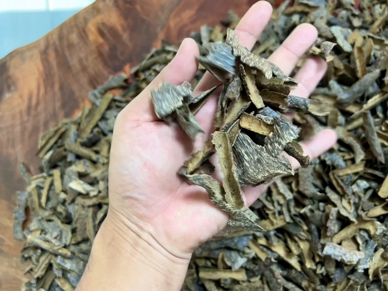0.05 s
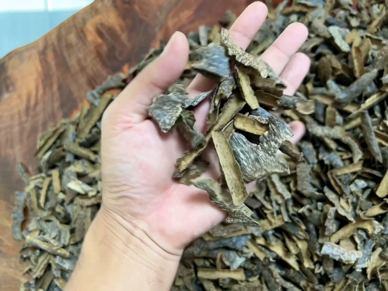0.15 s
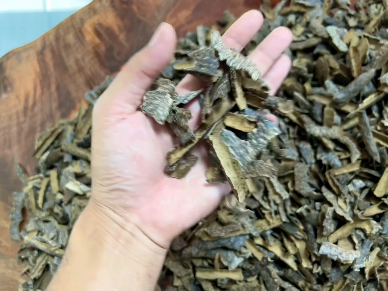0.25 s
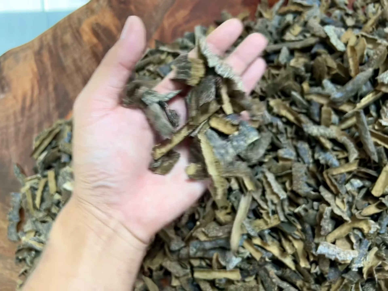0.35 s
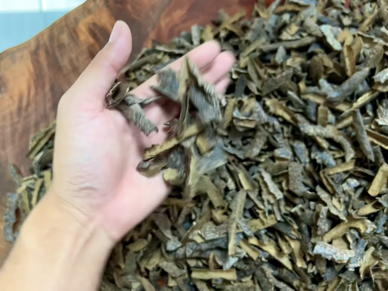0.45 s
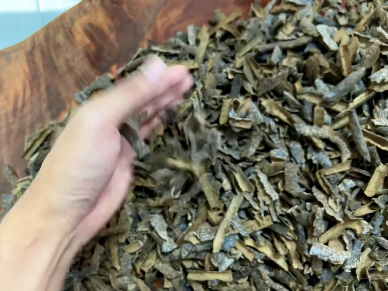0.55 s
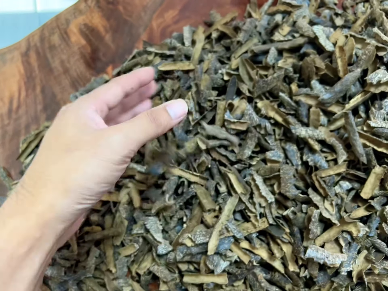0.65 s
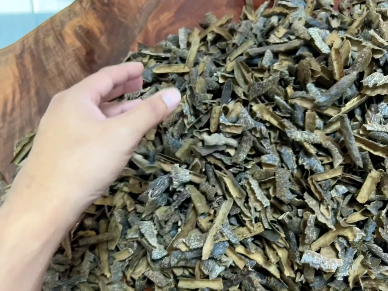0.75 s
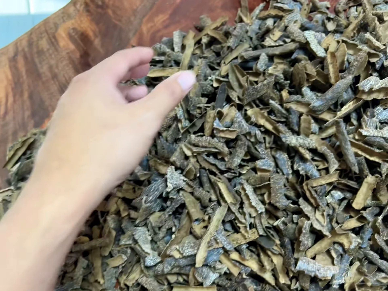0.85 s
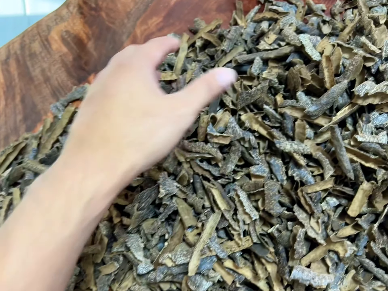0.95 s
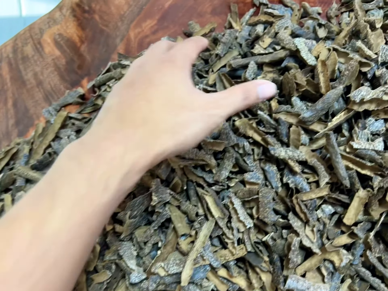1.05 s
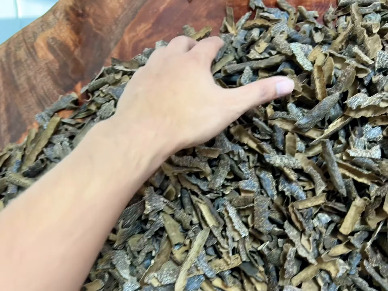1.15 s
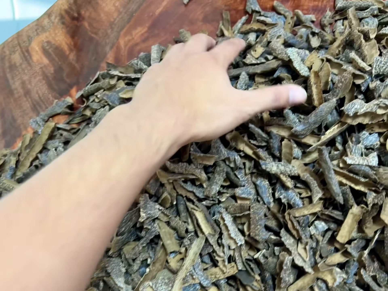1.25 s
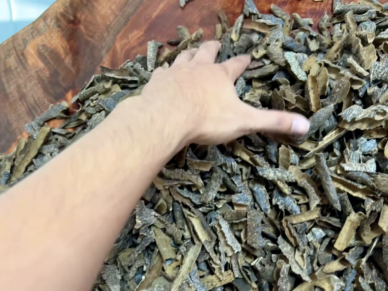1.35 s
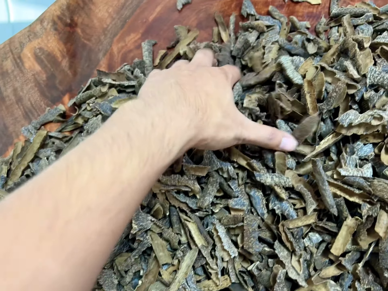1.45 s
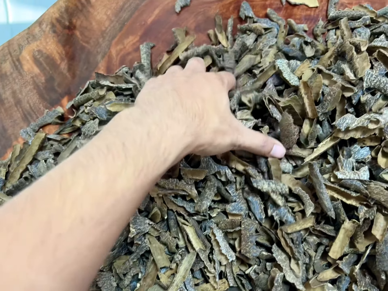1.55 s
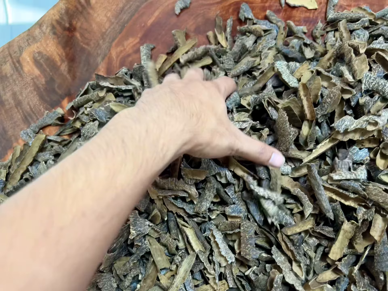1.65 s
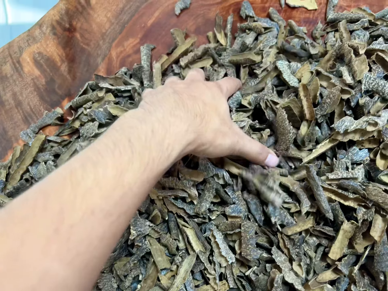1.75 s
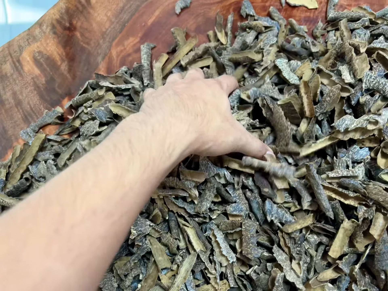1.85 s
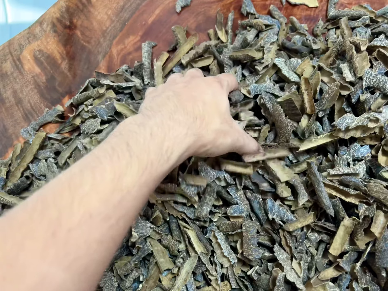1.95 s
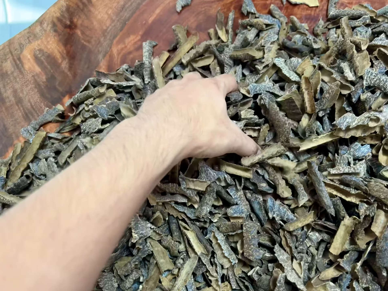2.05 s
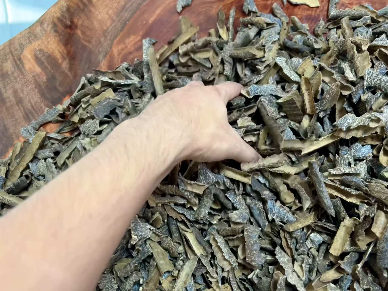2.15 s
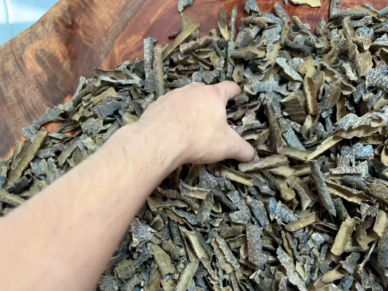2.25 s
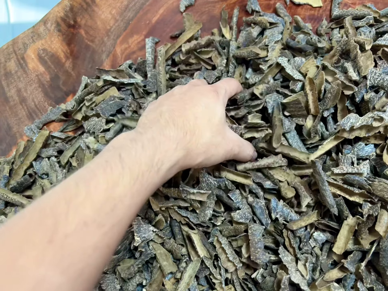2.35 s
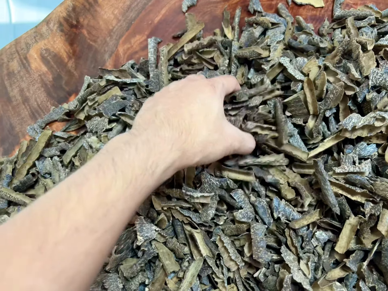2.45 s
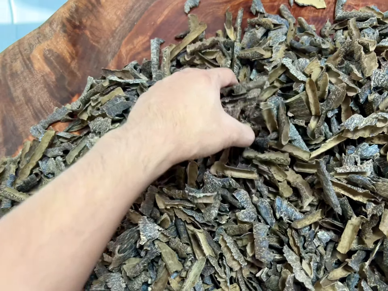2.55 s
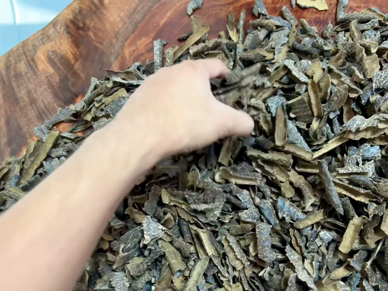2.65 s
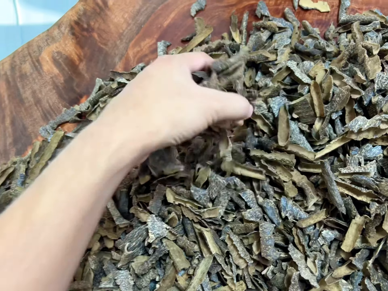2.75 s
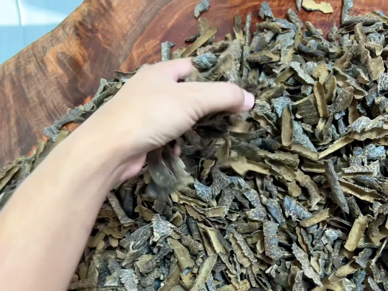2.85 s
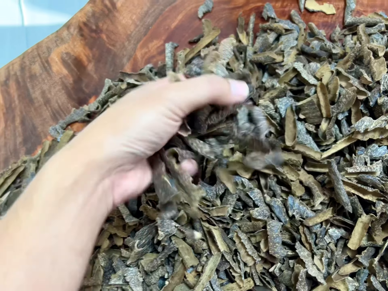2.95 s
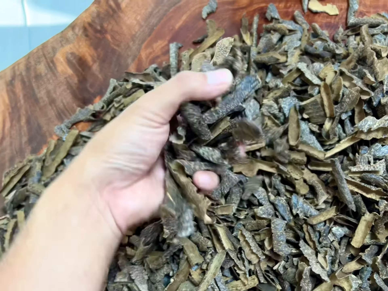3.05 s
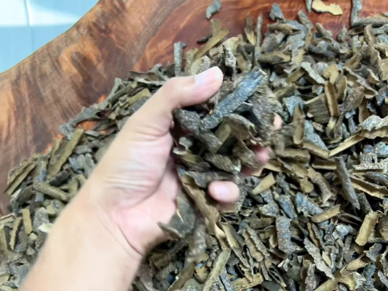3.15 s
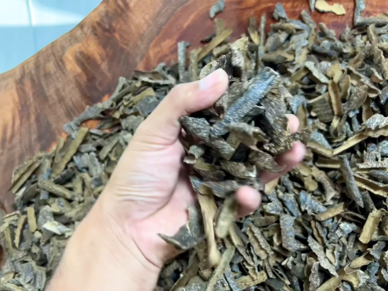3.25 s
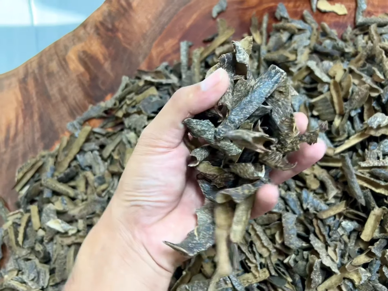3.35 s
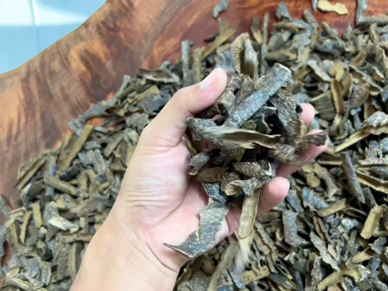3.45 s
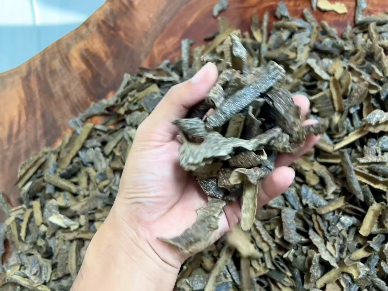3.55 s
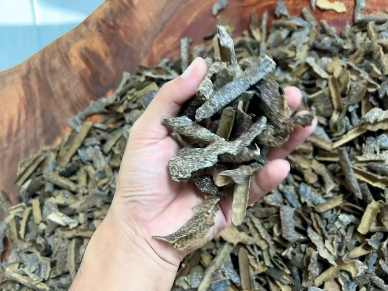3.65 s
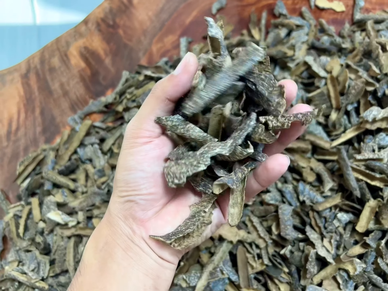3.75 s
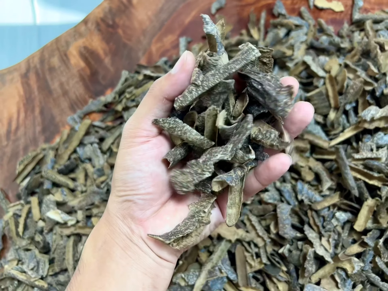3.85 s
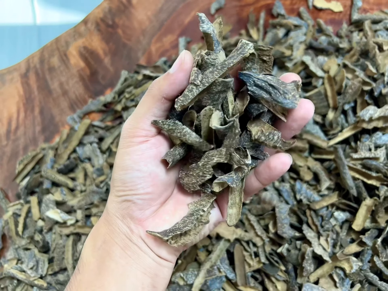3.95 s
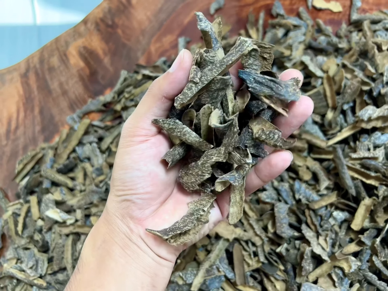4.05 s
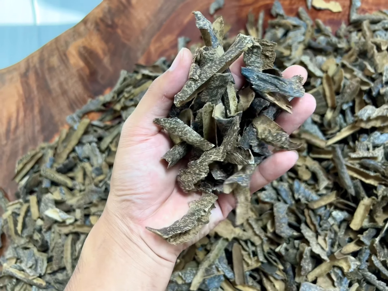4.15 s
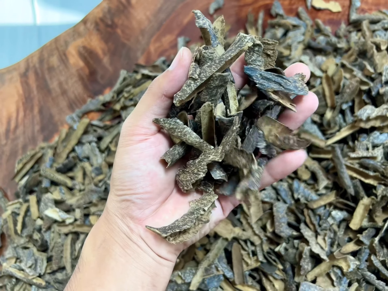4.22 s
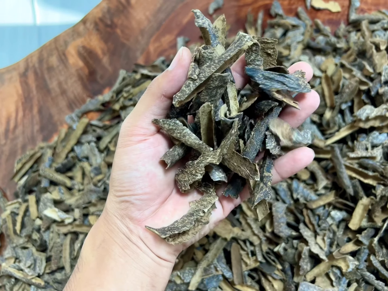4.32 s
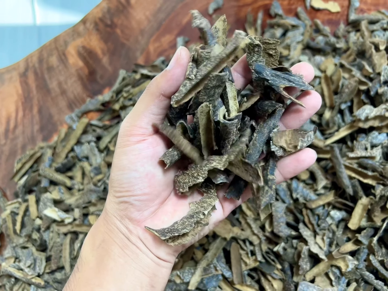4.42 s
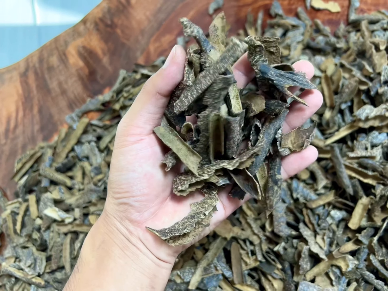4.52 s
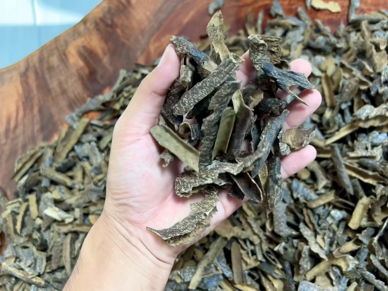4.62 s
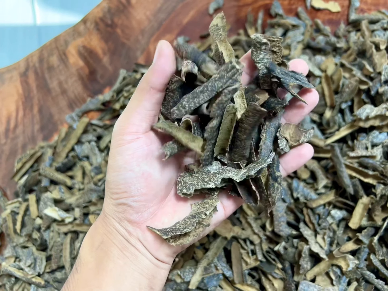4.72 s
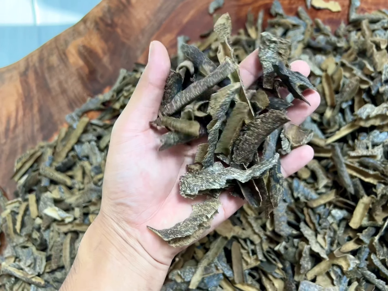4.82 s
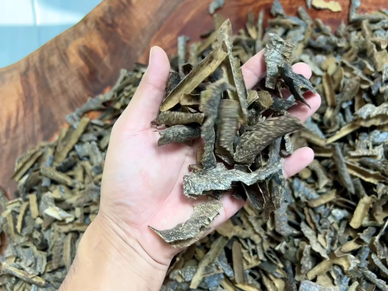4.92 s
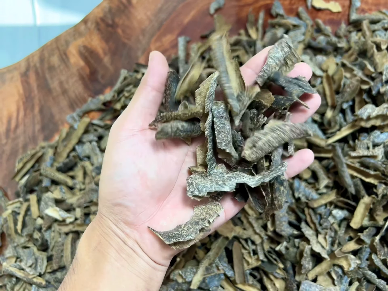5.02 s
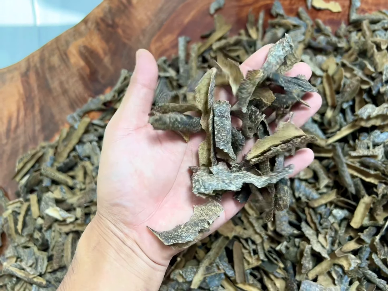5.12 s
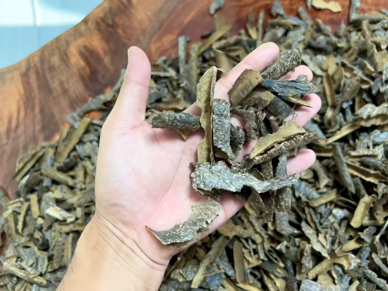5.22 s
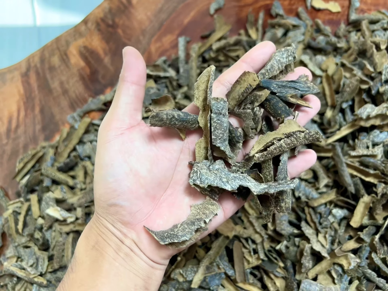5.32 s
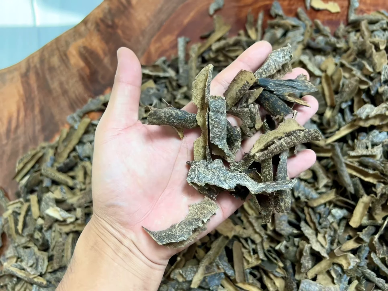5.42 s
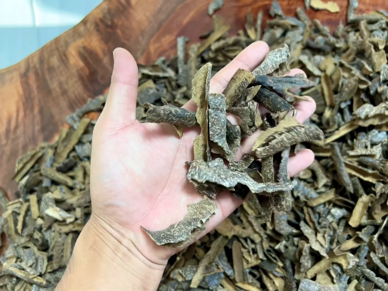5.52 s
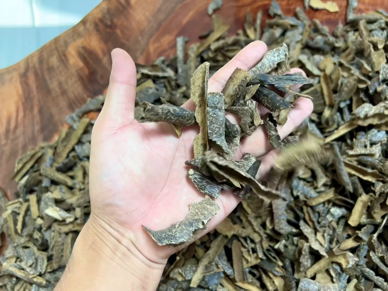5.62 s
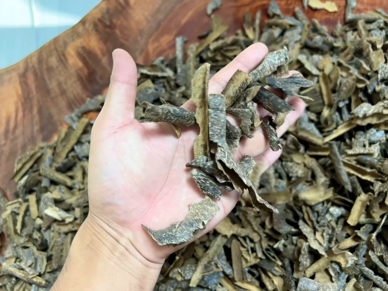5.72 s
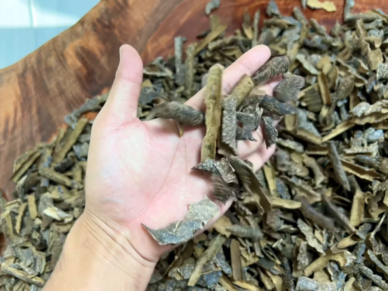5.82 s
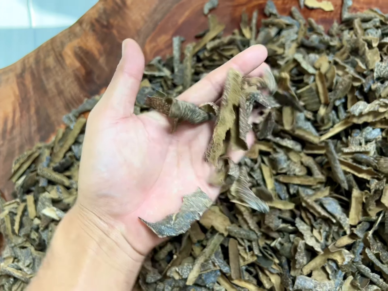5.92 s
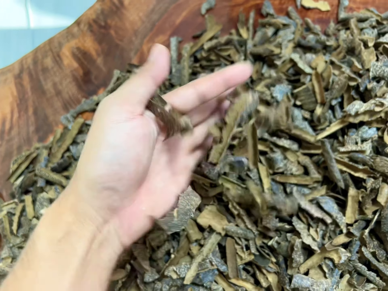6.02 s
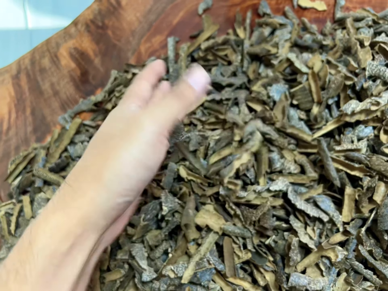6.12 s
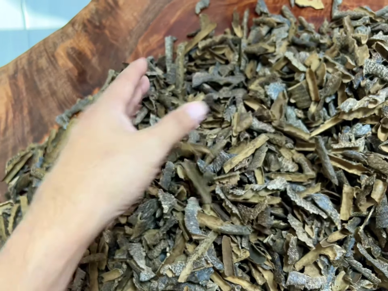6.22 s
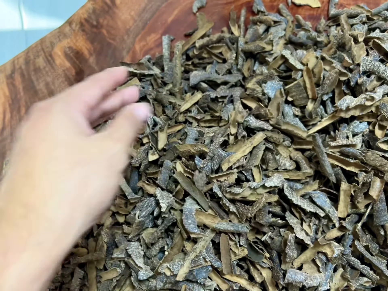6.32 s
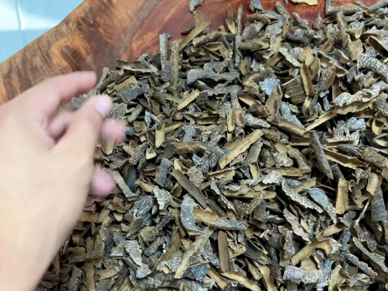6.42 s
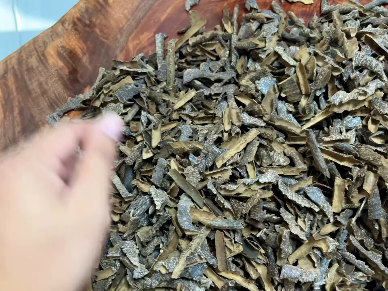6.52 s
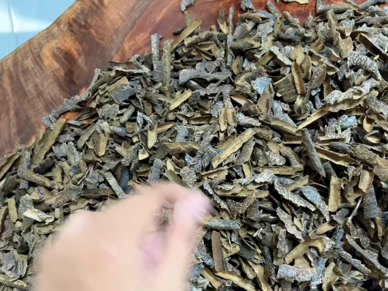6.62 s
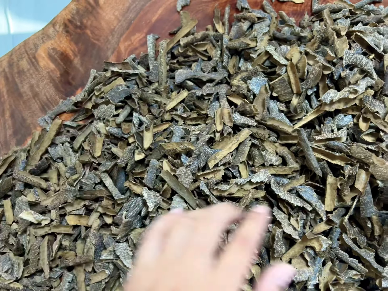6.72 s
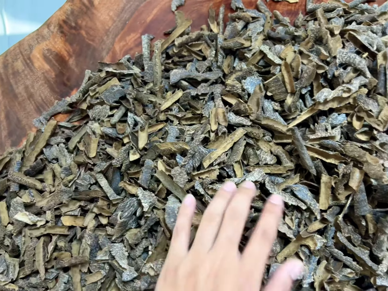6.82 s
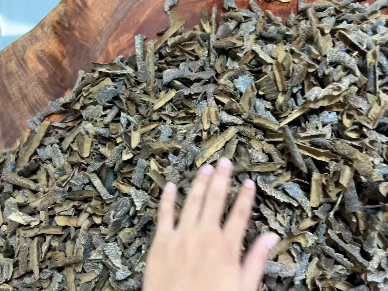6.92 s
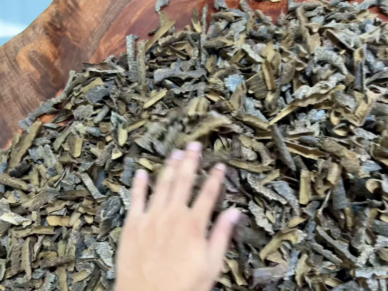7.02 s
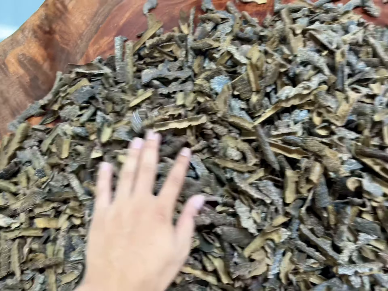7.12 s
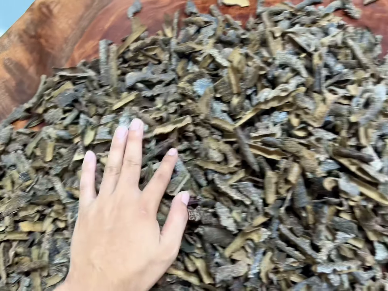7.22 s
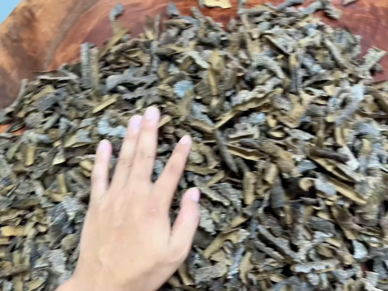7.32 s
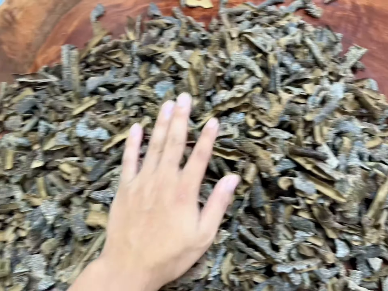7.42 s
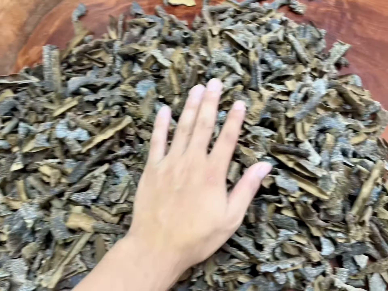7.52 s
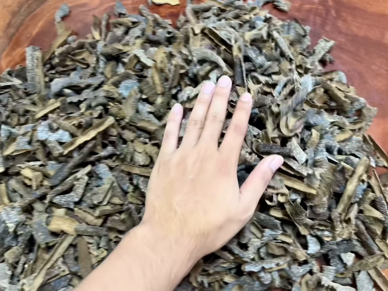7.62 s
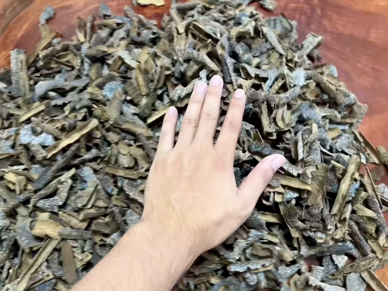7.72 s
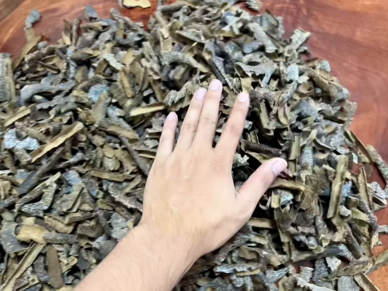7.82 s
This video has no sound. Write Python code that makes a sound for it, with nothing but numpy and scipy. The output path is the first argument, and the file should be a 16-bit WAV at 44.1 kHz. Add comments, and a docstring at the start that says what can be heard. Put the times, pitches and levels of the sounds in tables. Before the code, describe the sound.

Dry curled bark chips drop from a hand with crisp clacks, then get grabbed, jostled, dropped again and stroked in a rustling heap indoors.

```python
"""Bark chips on a wooden table

Indoors, one microphone, the direct sound well above the room's tail: a hand tips, grabs and strokes
dry curled bark chips in a heap. Falling chips clack as sprays of micro-impacts on short modes, pushed
chips rustle as thousands of tiny scraping knocks with brittle snaps, and the table booms faintly on
its low modes under the load. Behind it lie an appliance's mains hum and steady room air."""
import sys
import numpy as np
from scipy import signal
from scipy.fft import rfft, irfft, next_fast_len
from scipy.io import wavfile
from scipy.ndimage import uniform_filter1d

SR = 44100
rng = np.random.default_rng(int(sys.argv[2]) if len(sys.argv) > 2 else 0)


def store_pcm(level_fs):
    """Save levels as 16-bit WAV."""
    pcm = np.round(np.clip(level_fs, -1, 1) * 32767).astype(np.int16)
    wavfile.write(sys.argv[1], SR, np.atleast_2d(pcm).T)


N = 347067


def from_db(db):
    """Gain of a level in dB."""
    return 10 ** (np.asarray(db) / 20)


def rms_one(x):
    """Scaled to rms 1."""
    return x / np.sqrt(np.mean(x ** 2) + 1e-20)


def at_hz(points, hz):
    """A spectrum read on a log-frequency axis."""
    corners_hz, levels_db = np.array(points).T
    return np.interp(np.log(hz), np.log(corners_hz), levels_db)


def colour(x, points):
    """Shape a steady signal by a spectrum."""
    size = next_fast_len(N)
    hz = np.maximum(np.arange(size // 2 + 1) * SR / size, 1)
    return irfft(rfft(x, size) * from_db(at_hz(points, hz)), size)[:N]


def drift(rate_hz):
    """Slow random wander of rms 1: noise through a double low-pass pole."""
    r = np.exp(-2 * np.pi * rate_hz / SR)
    wander = signal.lfilter([1], [1, -2 * r, r * r], rng.standard_normal(N + SR))
    return rms_one(wander[SR:])   # the first second lets the filter settle


def resonance(x, hz, width_hz):
    """Two-pole band-pass with gain 1 on top."""
    r = np.exp(-np.pi * width_hz / SR)
    zeros = np.array([1, 0, -1]) * (1 - r * r) / 2
    poles = [1, -2 * r * np.cos(2 * np.pi * hz / SR), r * r]
    return signal.lfilter(zeros, poles, x + 1e-18)


# Colour of the room air: (frequency [Hz], relative density [dB per Hz])
AIR_COLOUR = [(30, -27), (45, 1.5), (100, -3), (250, 0.5), (450, -5), (650, -12), (1500, -22), (4000, -27),
              (7000, -42), (16000, -42)]
AIR_DB = -65.5   # rms


def room_air():
    """Steady noise of the quiet room, mostly low, shaped by its spectrum."""
    noise = rng.standard_normal(N)
    return from_db(AIR_DB) * rms_one(colour(noise, AIR_COLOUR))


# Mains harmonics of the appliance in the room: (frequency [Hz], level around which it wavers [dB rms])
HUM_HARMONICS = [(102.3, -74.5), (199.2, -63.5), (247.6, -75.5), (301.5, -77), (398.4, -73), (500.6, -78)]


def hum(waver_db):
    """Mains harmonics of an appliance, each throbbing unevenly."""
    t = np.arange(N) / SR
    total = np.zeros(N)
    for hz, db in HUM_HARMONICS:
        level = from_db(db + waver_db * drift(11))
        total += np.sqrt(2) * level * np.sin(2 * np.pi * (hz * t + rng.random()))
    return total


ROOM_T60_S, ROOM_DB, WALL_CUT_HZ = 0.59, -13, 7200   # decay, tail re direct sound, low-pass of the long tail


def room(x):
    """Tail of dense reflections that dies exponentially, treble first."""
    t = np.arange(SR) / SR
    dull, bright = rng.standard_normal((2, SR))
    low_pass = signal.butter(2, WALL_CUT_HZ, fs=SR, output="sos")
    long_tail = signal.sosfilt(low_pass, dull) * from_db(-60 * t / ROOM_T60_S)
    short_tail = 2.86 * bright * from_db(-60 * t / (0.17 * ROOM_T60_S))
    tail = (long_tail + short_tail) * (t > .003)   # first wall path
    tail /= np.sqrt(np.sum(tail ** 2))
    return from_db(ROOM_DB) * signal.fftconvolve(x, tail)[:N]


# Low modes of the wooden table top: (frequency [Hz], width [Hz], relative level [dB])
TABLE_MODES = [(104.2, 6.3, 0.5), (137, 58, 6), (224, 37, 1)]
BOOM_DB, BOOM_LAG_S = -63, 0.022   # boom at a rustle of -45 dB; smoothing of the load


def table(rustle_db):
    """The heap's shifting weight drives the low modes of the table top, following the rustle with a lag."""
    keep = np.exp(-1 / (BOOM_LAG_S * SR))
    load_db = signal.lfilter([1 - keep], [1, -keep], rustle_db + 45)
    load = rng.standard_normal(N)
    boom = np.zeros(N)
    for hz, width_hz, db in TABLE_MODES:
        boom += from_db(db) * resonance(resonance(load, hz, width_hz), hz, 2 * width_hz)
    return from_db(BOOM_DB + load_db) * rms_one(boom)


# Chips pushed or sliding as a mass: (start [s], rise [s], hold [s], nominal rustle level [dB],
# treble re rustle [dB])
MASS_SHOVES = [(0.0, 0.068, 0.016, -55, 2.5), (0.546, 0.011, 0.11, -40, 4.5), (1.291, 0.043, 0.05, -40, -8),
               (1.413, 0.063, 0.074, -38, -9.5), (1.607, 0.029, 0.22, -41, -9),
               (1.799, 0.14, 0.039, -37, -6.5), (2.062, 0.058, 0.029, -35, -7.5),
               (2.168, 0.085, 0.069, -37, -9), (2.367, 0.089, 0.026, -38.5, -7),
               (2.549, 0.05, 0.21, -41, -5.5), (2.925, 0.043, 0.016, -42, -24),
               (3.296, 0.18, 0.033, -45, -9), (3.737, 0.037, 0.12, -49.5, -5),
               (4.142, 0.13, 0.012, -56, -2), (4.356, 0.13, 0.21, -56.5, -3.5),
               (4.677, 0.031, 0.099, -52, -3), (4.905, 0.071, 0.11, -50, -2),
               (5.087, 0.096, 0.022, -38.5, -5.5), (5.302, 0.044, 0.0097, -37.5, -10),
               (5.486, 0.071, 0.056, -49, -14.5), (5.763, 0.012, 0.023, -39, 0.5),
               (5.961, 0.038, 0.03, -44.5, -3.5), (6.03, 0.12, 0.04, -48, -17.5),
               (6.878, 0.095, 0.04, -41, -7.5), (6.937, 0.088, 0.097, -36, -6.5),
               (7.538, 0.009, .02, -63, -6), (7.593, 0.01, .3, -39, -11)]
RISE_DB, FALL_DB_PER_S, TREBLE_FALL_DB_PER_S = 14.5, 102, 150.5   # every shove swells and dies alike
CONTACT_S = 0.0087   # a shove fades in over this time just before its start
# Chips settle after a clack: level re its peak, fall, treble re that level
SETTLE_DB, SETTLE_DB_PER_S, SETTLE_TREBLE_DB = -31, 138, -7
REST_DB, REST_TREBLE_DB = -84, -98   # the heap at rest


def stir():
    """Rustle and treble level in dB: shoves rise, hold and fall, clacks leave chips settling; powers add."""
    now, power = np.arange(N) / SR, np.zeros((2, N))
    for start, rise_s, hold_s, level_db, treble_db in MASS_SHOVES:
        rising = np.clip(1 - (now - start) / rise_s, 0, 1)
        touching = np.clip((now - start) / CONTACT_S + 1, 0, 1) ** 2
        after = np.maximum(now - start - rise_s - hold_s, 0)
        top_db = level_db - RISE_DB * rising
        body_db = top_db - FALL_DB_PER_S * after
        bright_db = top_db + treble_db - TREBLE_FALL_DB_PER_S * after
        power += touching * from_db(2 * np.array([body_db, bright_db]))   # doubled dB: power
    struck = np.zeros(N)
    for s, peak_db, *_ in CHIP_CLACKS:
        struck[round(s * SR)] = from_db(2 * (peak_db + SETTLE_DB))
    settling = signal.lfilter([1], [1, -from_db(-2 * SETTLE_DB_PER_S / SR)], struck + 1e-30)
    power += settling * from_db([[0], [2 * SETTLE_TREBLE_DB]])
    power += from_db([[2 * REST_DB], [2 * REST_TREBLE_DB]])
    return 10 * np.log10(power)


# Colour of the rustle: (frequency [Hz], relative density [dB per Hz])
RUSTLE_COLOUR = [(150, -41), (260, -11), (274, -14.5), (401, -9.5), (445, -10.5), (973, -3.5), (2400, -3),
                 (3280, -2), (9970, -1.5), (11300, 0), (15400, -10), (16500, -20.5)]


def rustle(rustle_db, treble_db, spread_db, clump_db, quality, scrape_s):
    """Clumped random knocks, each a tiny scrape ringing a small chip; a firmer push knocks more often."""
    per_s = 3000 + 6000 * from_db(.5 * (rustle_db + 46.0))
    sizes = from_db(spread_db * np.minimum(rng.exponential(1, N), 5))
    slips = drift(45)
    brief_slips = slips - uniform_filter1d(slips, size=2500)   # the hand sets the slow swell
    clumps = from_db(clump_db * brief_slips)
    knocks = sizes * (rng.random(N) < per_s * clumps / SR) / np.sqrt(per_s)
    pitches, dealt = np.geomspace(300, 15500, 32), rng.integers(0, 32, N)
    fade, grit = np.exp(-1 / (scrape_s * SR)), rng.standard_normal(N)
    out = np.zeros(N)
    for k, hz in enumerate(pitches):
        struck = knocks * ((dealt == k) | (dealt == (k + 11) % 32))   # a knock sounds two modes
        envelope = signal.lfilter([1], [1, -fade], struck + 1e-18)
        scraped = np.roll(grit, 997 * k) * envelope
        ringing = resonance(resonance(scraped, hz, hz / quality), hz, hz / 2)
        share = np.clip(np.log2(hz / 5000), 0, 1)   # high modes follow the treble level
        level_db = (1 - share) * rustle_db + share * treble_db + at_hz(RUSTLE_COLOUR, hz) - 44.5
        out += from_db(level_db) * np.sqrt(hz) * rms_one(ringing)   # bands widen with pitch
    return out


SNAPS_PER_S = 120   # brittle edges snapping inside the rustle
SNAP_DB, SNAP_SPREAD_DB, SNAP_HZ = 16, 5, 3000   # size re rustle before the band-pass, spread, lower edge


def snaps(rustle_db):
    """Lone broadband clicks a few samples long, as strong as the rustle around them."""
    sizes = from_db(SNAP_SPREAD_DB * np.minimum(rng.exponential(1, N), 4)) * rng.choice([-1, 1], N)
    happens = rng.random(N) < SNAPS_PER_S / SR
    clicks = sizes * happens * from_db(rustle_db + SNAP_DB)
    band = signal.butter(2, [SNAP_HZ, 13000], "band", fs=SR, output="sos")
    return signal.sosfilt(band, clicks + 1e-18)


# Spells when chips lie loose in the hand or tumble: (from [s], to [s])
LOOSE_SPELLS = [(0.0, 0.9), (2.4, 6.4)]
SMALL_PER_S, SMALL_DB, SMALL_SPREAD_DB = 32, 17, 2.5   # rate while loose, least peak re rustle, spread
SMALL_BODY_DB, SMALL_TREBLE_DB, SMALL_COLOUR_DB = -8, -5.5, 13   # mean colour re middle, its full range


def small_clacks(rustle_db):
    """Rows for clacks() at random moments, as strong as the rustle around them allows."""
    when, size, body, treble, pitch = rng.random((int(SMALL_PER_S * N / SR), 5)).T
    s = when * N / SR
    peak_db = rustle_db[(when * N).astype(int)] + SMALL_DB - SMALL_SPREAD_DB * np.log(1 - .95 * size)
    body_db = SMALL_BODY_DB + SMALL_COLOUR_DB * (body - .5)
    treble_db = SMALL_TREBLE_DB + SMALL_COLOUR_DB * (treble - .5)
    main_hz = 2000 * 4 ** pitch
    rows = zip(s, peak_db, body_db, treble_db, main_hz)
    return [row for row in rows if any(start < row[0] < end for start, end in LOOSE_SPELLS)]


# Single chips striking: (time [s], nominal peak [dB], body below 2 kHz re middle [dB],
# treble above 7 kHz re middle [dB], strongest mode [Hz])
CHIP_CLACKS = [(0.05, -33, -12, 9, 5330), (0.212, -16, -1.5, 5, 5380), (0.23, -14.5, -11, -2.5, 3880),
               (0.288, -14, -3.5, -1.5, 1180), (0.372, -18.5, 2.5, 6.5, 3470), (0.38, -17.5, -9, 0, 4230),
               (0.401, -24, -12, 4, 6000), (0.41, -18, -17.5, 2.5, 5530), (0.458, -25, -13, -7, 3000),
               (0.471, -21.5, -13.5, 1, 2110), (0.511, -25.5, -8.5, -1, 5430), (0.549, -8, -12, 5, 7180),
               (0.561, -17, -3.5, 0.5, 7200), (0.571, -13, -6, 7.5, 9000), (0.589, -9.5, -12, -2, 6740),
               (0.594, -5, -7, 0.5, 6500), (0.605, -9.5, -11, -4, 5000), (0.618, -7.5, -20, 3, 5650),
               (0.644, -13.5, -2, -2.5, 6960), (0.671, -12, -23.5, -10, 6460), (0.712, -10.5, -4, -1, 6900),
               (0.728, -13, -16.5, -2, 6560), (0.744, -12, -17, -1, 6200), (0.798, -25.5, -16, 4, 3240),
               (0.848, -29.5, -20, -14, 4660), (1.497, -24, -10, 3, 5300), (1.521, -23, -10, -6, 6940),
               (1.558, -27, -4, -4, 3170), (1.655, -23.5, -12, -8, 1800), (1.689, -25, -12, -11, 6900),
               (1.835, -31, -10, 5, 6320), (1.944, -22, -15, 6, 10600), (2.259, -23, -18, -9, 7300),
               (2.374, -22.5, -6, 2, 3340), (2.413, -19, -2, -2, 3060), (2.514, -25.5, -26, -15, 5000),
               (2.609, -17, 1, 9, 3700), (2.632, -26.5, -10, 4, 9000), (2.704, -16, -17, -8, 6600),
               (2.785, -20, -15, -3, 1670), (2.826, -24.5, -11, -4, 1710), (2.892, -19.5, -14, -17, 3600),
               (2.959, -24, -8, -9, 4800), (2.992, -18.5, -3, 4, 4000), (2.999, -16.5, -8, 1, 3840),
               (3.017, -22, -4, -8, 4540), (3.077, -25, -6, 1, 8400), (3.095, -28.5, -7, -16, 2540),
               (3.144, -24, -8, 0, 4240), (3.154, -19.5, -16, -2, 7000), (3.165, -12.5, -23, 4.5, 3100),
               (3.173, -18.5, -18, 23, 8140), (3.236, -26, -15, -9, 5560), (3.27, -15.5, -11, -1, 3020),
               (3.285, -19, -10, -5, 3020), (3.308, -24, -5, -5, 6400), (3.395, -24.5, 0, 11, 3000),
               (3.481, -17.5, -7, -1, 980), (3.571, -10.5, -4, 5, 6060), (3.583, -16.5, -7, 4, 5800),
               (3.639, -16.5, -6, 4, 4700), (3.82, -23.5, -8, -13, 2830), (3.84, -24, -10, 2, 7080),
               (3.886, -30.5, -20, -13, 3130), (3.922, -23.5, -13, -7, 5160), (3.985, -31.5, -4, 5, 2280),
               (4.032, -15.5, -12, 3, 1370), (4.1, -29.5, -15, -1, 3600), (4.187, -30.5, -20, -5, 5040),
               (4.357, -26, -4.5, -1, 3490), (4.525, -30.5, -21, 0, 4000), (4.535, -25.5, -11, -11, 4140),
               (4.583, -31.5, -14, -15, 4970), (4.616, -29.5, -4, 0, 2700), (4.641, -27, -31, -12, 7250),
               (4.72, -28.5, -22, -7, 3970), (4.732, -33.5, -14, -1, 3020), (4.75, -19, -3.5, -8, 7300),
               (4.76, -27.5, -13, -9, 1160), (4.878, -24, -12, 2, 3420), (4.929, -28, -1, 4, 3970),
               (4.98, -27.5, -24, -16, 5130), (5.01, -12.5, -27, -2, 8200), (5.055, -12.5, -4.5, 2, 7300),
               (5.132, -12, -6.5, -3, 4180), (5.192, -12.5, -8, -5, 4600), (5.215, -26.5, -13, -12.5, 4800),
               (5.233, -16.5, -6.5, -13, 3400), (5.269, -11, -7.5, -11, 4300), (5.316, -12, -12, -4, 3450),
               (5.336, -18.5, -23, -2, 5100), (5.366, -18.5, 5, -10.5, 5000),
               (5.429, -33.5, 10.5, -22, 1300), (5.489, -15, -1, -2.5, 3600),
               (5.521, -14.5, -5, -10.5, 1220), (5.525, -22, -15, -1.5, 1190),
               (5.54, -18.5, -7.5, -3, 1210), (5.546, -22.5, -15.5, 1.5, 8440),
               (5.55, -16.5, -1, -14, 6130), (5.562, -24, -1, -2, 4770), (5.641, -23.5, -4, -5.5, 3040),
               (5.768, -7.5, -1, 9.5, 7000), (5.778, -7, -12.5, 1.5, 7150), (5.802, -12, -12, 0, 4230),
               (5.863, -17.5, -21, -5, 5060), (5.904, -18, -9.5, 1, 4140), (5.942, -25, -4, -4, 7100),
               (5.98, -15.5, -7.5, -4, 6430), (5.996, -17.5, 7, 11.5, 8800), (6.043, -2.5, -32, 3, 3900),
               (6.075, -15, -17, -12.5, 3720), (6.097, -15, -15, 8.5, 4150),
               (6.104, -2.5, -13, -13.5, 3920), (6.122, -3.5, -21, -4, 6150), (6.135, -12, -7, 0, 5850),
               (6.164, -10.5, -15, 8, 6200), (6.168, -8, -11.5, -11, 7860), (6.207, -16, 5, 3, 2840),
               (6.255, -14.5, -9, -1, 4460), (6.261, -15, -20, 9, 3780), (6.343, -30.5, -7, -6, 4130),
               (6.888, -34.5, -11, 4, 4120), (6.91, -30, -4, -9, 4400), (6.942, -21.5, 4, 10, 3000),
               (6.96, -23.5, -5, -2, 7340), (6.998, -21.5, -7, -5, 4900), (7.125, -24.5, -13, 6, 2990),
               (7.173, -21, 10, 15, 6500), (7.234, -25.5, -2, -5, 6500), (7.284, -23, -17, -2, 4040),
               (7.313, -31, -20, -13, 4200), (7.539, -32, -9, -0.5, 6430), (7.651, -20, -2, -6, 4130),
               (7.807, -21, -4, 2, 2260), (7.82, -20.5, -8, -10, 5800)]
# Body, middle and treble modes of a chip: (from [Hz], to [Hz], T60 [s])
MODE_RANGES = [(1020, 1875, 0.0087), (2260, 7000, 0.017), (6880, 13000, 0.0084)]
MAIN_MODE_DB, MAIN_MODE_T60_S = -5.5, 0.014   # the strongest mode, re all others
LEAD_S, LEAD_DB = 0.0012, -6.5   # a chip grazes its neighbour just before it strikes
FOCUS_DB_PER_OCT = 1.5   # middle modes fade away from the strongest one


def clacks(rows, rattle_s, bounce, uneven_db, rise_s, crest_db):
    """A clack is a spray of micro-impacts within some ms, ringing that chip's own many short modes."""
    out, t = np.zeros(N + 2048), np.arange(1024) / SR
    onset = 1 - np.exp(-t / rise_s)
    draws = rng.random((len(rows), 3, 3, 24))
    rattles, lead = rng.random((len(rows), 2, 20)), round(LEAD_S * SR)
    for (s, peak_db, body_db, treble_db, main_hz), chip, (when, size) in zip(rows, draws, rattles):
        main = np.sin(2 * np.pi * main_hz * t) * from_db(-60 * t / MAIN_MODE_T60_S) * onset
        ring = 0
        levels_db, focuses = (body_db, 0, treble_db), (0, FOCUS_DB_PER_OCT, 0)
        for (low, high, t60), level_db, focus, (place, strength, phase) in zip(
                MODE_RANGES, levels_db, focuses, chip):
            hz = low + (high - low) * (np.arange(24) + place) / 24
            mode_db = uneven_db * strength - focus * np.abs(np.log2(hz / main_hz))
            mode_db -= 0.87 * np.maximum(hz - 11500, 0) / 1000   # the highest modes sound weaker, falling 0.87 dB per kHz above 11.5 kHz
            modes = from_db(mode_db) @ np.sin(2 * np.pi * (hz[:, None] * t + phase[:, None]))
            ring = ring + from_db(level_db) * rms_one(modes * from_db(-60 * t / t60) * onset)

        impacts = np.zeros(1024)
        length_s = rattle_s * (.4 + 1.2 * size[-1])   # crisp or drawn out
        bounces = lead + (length_s * SR * when).astype(int)
        impacts[bounces] = (2 * size - 1) * bounce * (1 - when)   # later bounces are weaker
        grazes = (lead * when[:6]).astype(int)
        impacts[grazes] = from_db(LEAD_DB) * (2 * size[6:12] - 1) * when[:6]
        impacts[lead] = 1   # main blow

        first_blow = np.pad(main, (lead, 1023 - lead))   # the strongest mode answers the main blow alone
        clack = rms_one(np.convolve(impacts, ring)) + from_db(MAIN_MODE_DB) * rms_one(first_blow)
        at = max(round(s * SR) - lead, 0)
        out[at:at + 2047] += from_db(peak_db - crest_db) * rms_one(clack)
    no_bass = signal.butter(4, 700, "high", fs=SR, output="sos")   # small chips radiate no bass
    return signal.sosfilt(no_bass, out[:N])


def scene():
    """Chips and their room tail over the table boom, the hum and the air."""
    rustle_db, treble_db = stir()
    chips = rustle(rustle_db, treble_db, spread_db=-1.0, clump_db=1.0, quality=8.6, scrape_s=0.00038)
    chips += snaps(rustle_db)
    chips += clacks(small_clacks(rustle_db) + CHIP_CLACKS, rattle_s=0.0041, bounce=0.74,
                    uneven_db=9.0, rise_s=0.00016, crest_db=23.0)
    background = room_air() + hum(waver_db=3.5) + table(rustle_db)
    return (background + chips + room(chips))[None]   # one channel


def record(dry):
    """Microphone channel: a rumble cut at 40 Hz and a steep top cut from 16.9 kHz."""
    rumble_cut = signal.butter(6, 40, "high", fs=SR, output="sos")
    top_cut = signal.cheby2(14, 70, 16900, fs=SR, output="sos")
    return signal.sosfilt(top_cut, signal.sosfilt(rumble_cut, dry))


dry = scene()
out = record(dry)
store_pcm(out)
```